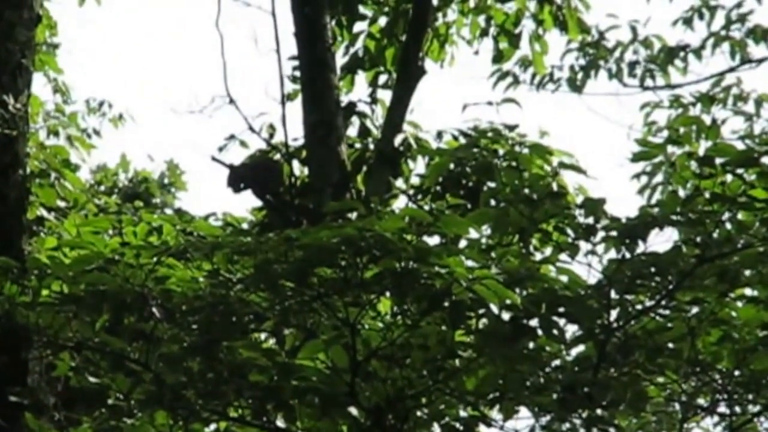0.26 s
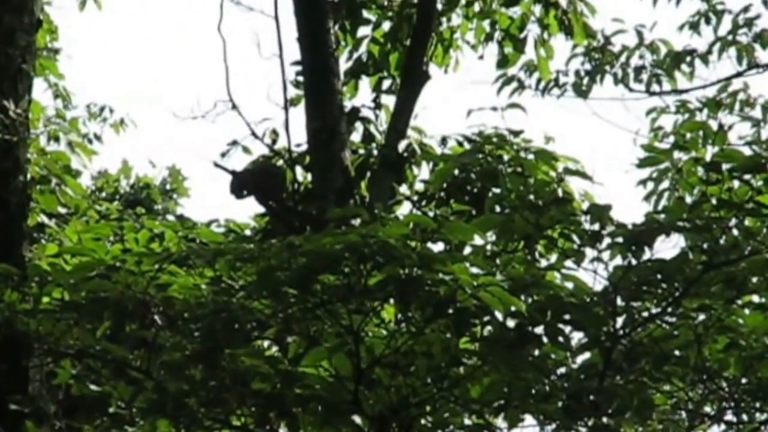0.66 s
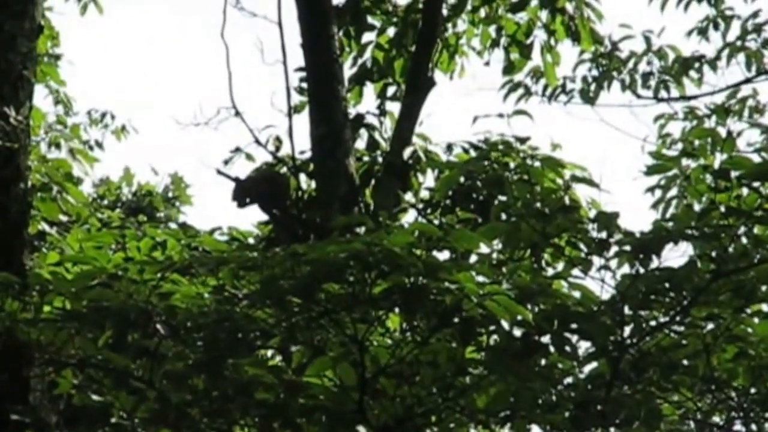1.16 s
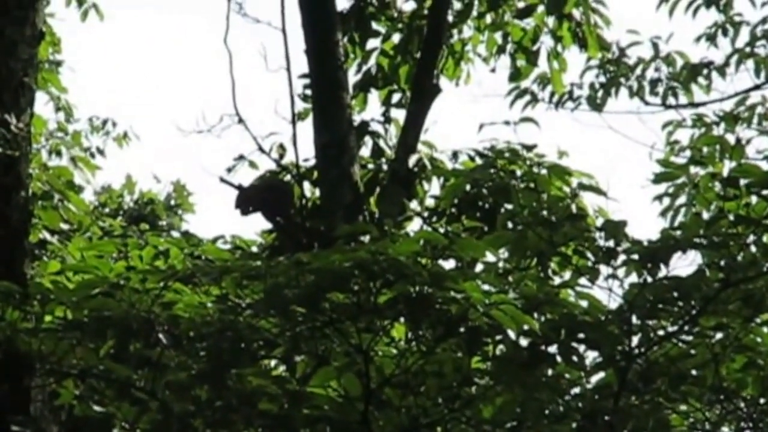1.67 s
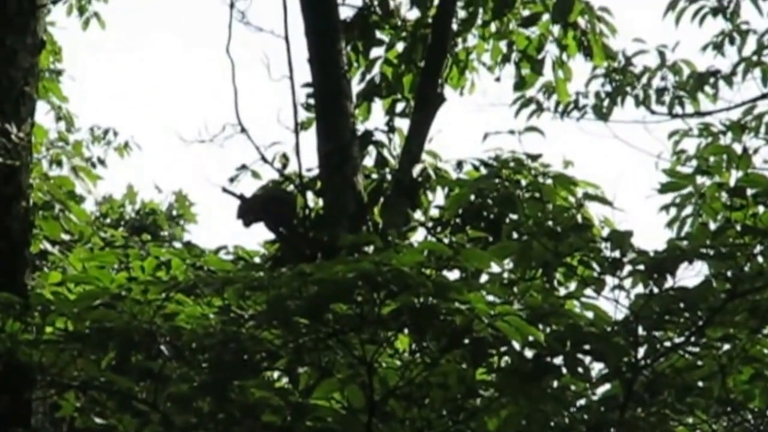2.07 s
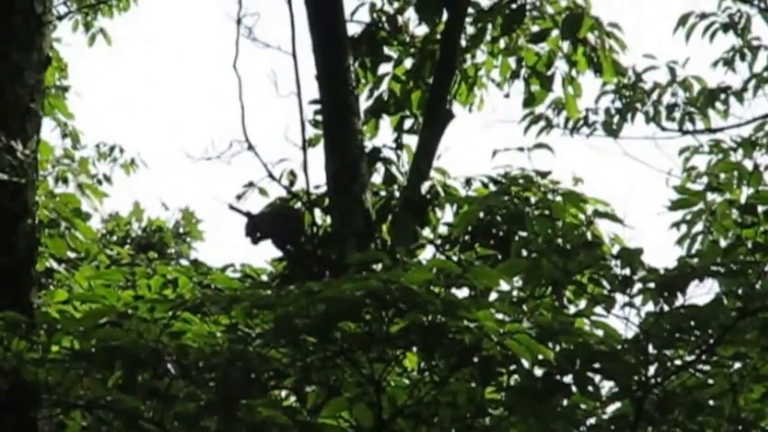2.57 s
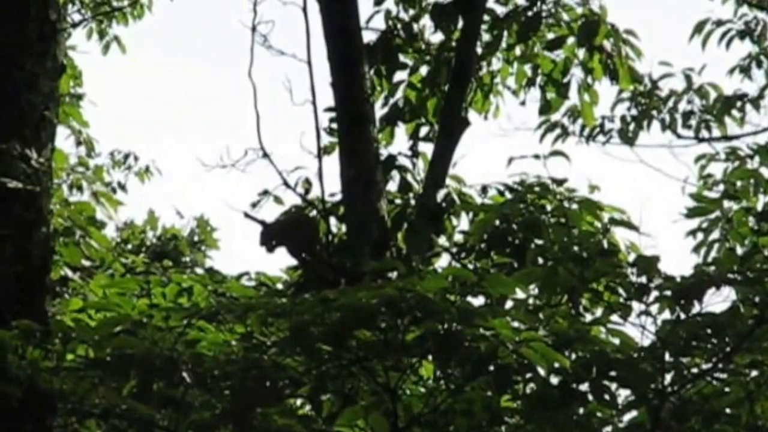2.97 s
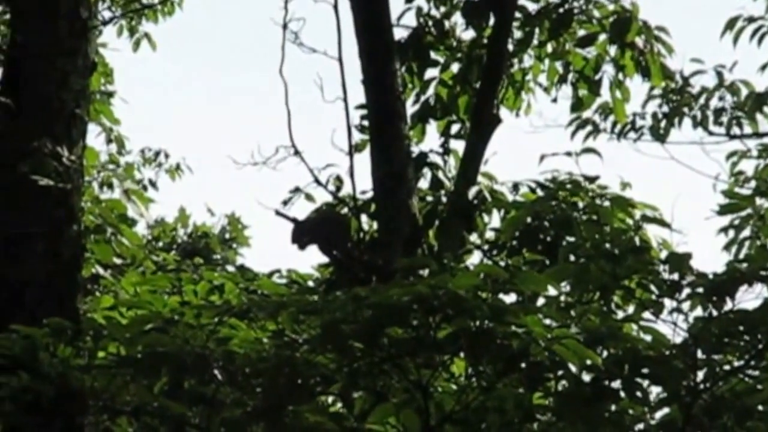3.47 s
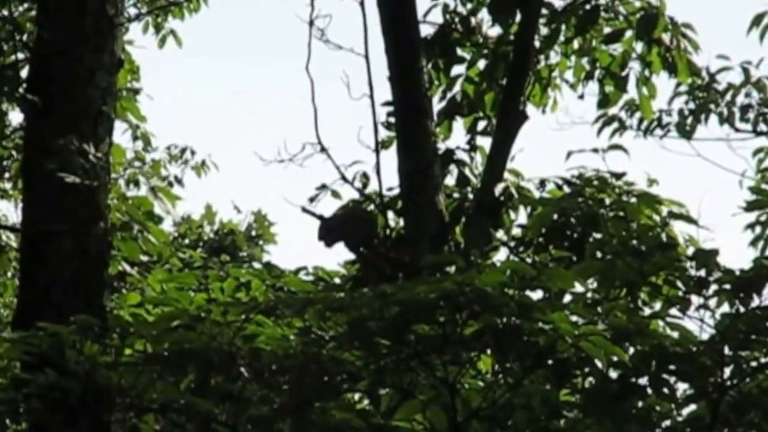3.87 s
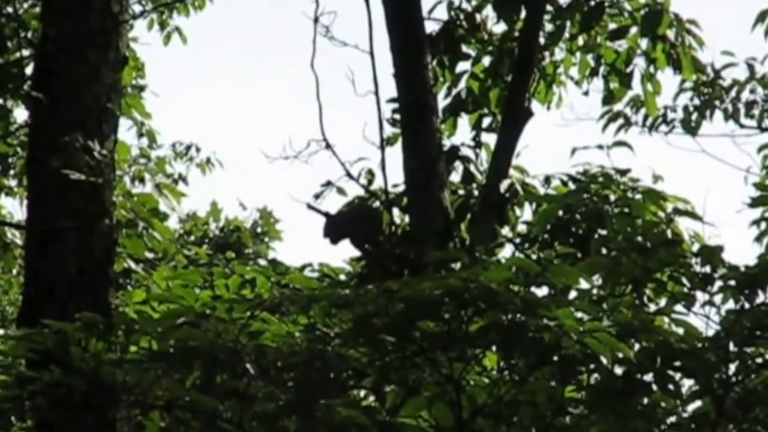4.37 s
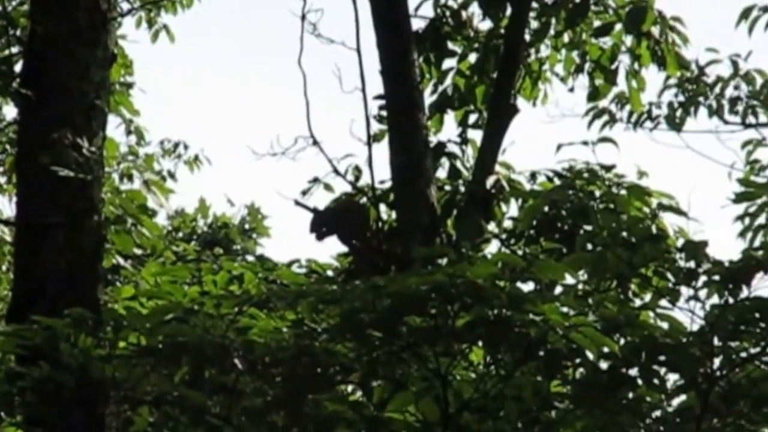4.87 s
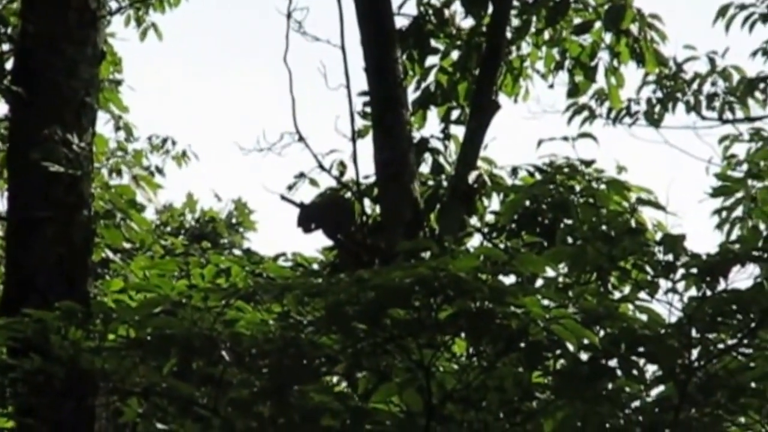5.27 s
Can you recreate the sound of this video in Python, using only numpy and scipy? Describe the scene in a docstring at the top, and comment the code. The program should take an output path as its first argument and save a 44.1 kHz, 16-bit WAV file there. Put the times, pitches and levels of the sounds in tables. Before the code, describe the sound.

A steady, shrill chorus of crickets and katydids in summer woods, with faint knocks and two short bird whistles near the end.

```python
"""Summer woods insect chorus

Katydids and crickets scrape their wings in a dense, shrill chorus, strongest on the right, over a
distant hum and soft hiss. A lower group rasps in waves, two far crickets chirp, a near one trills
louder and louder until all sound drops out briefly. A far dove coos, soft knocks fall, and near
the end a bird whistles twice."""
import sys
import numpy as np
from scipy import signal
from scipy.fft import rfft, irfft, next_fast_len
from scipy.io import wavfile
from scipy.ndimage import map_coordinates

SR = 44100
rng = np.random.default_rng(int(sys.argv[2]) if len(sys.argv) > 2 else 0)


def to_wav(sig):
    """Store sig (one row per channel, or 1-D mono) as 16-bit WAV at the path in sys.argv[1].

    Samples outside -1..1 are clipped; the rate is SR.
    """
    pcm = np.clip(np.atleast_2d(sig), -1, 1) * 32767
    pcm = np.round(pcm).astype(np.int16)
    wavfile.write(sys.argv[1], SR, pcm.T)  # frames by channels


N = 243431
T = np.arange(N) / SR


def amp(db):
    """Decibels to gain."""
    return 10 ** (np.asarray(db) / 20)


def unit(x):
    """Scale to rms 1."""
    return x / np.sqrt(np.mean(x ** 2) + 1e-20)


def along(points, hz):
    """Read (freq_hz, value) points on a log axis."""
    freq_hz, values = np.transpose(points)
    return np.interp(np.log(hz + 1), np.log(freq_hz + 1), values)


def wobble(rate_hz):
    """Smooth random curve, rate_hz knots a second."""
    return map_coordinates(rng.standard_normal(int(N * rate_hz / SR) + 4), [T * rate_hz])


def filtered(x, response):
    """Apply a gain given as a function of frequency."""
    size = next_fast_len(N + SR // 2)
    return irfft(rfft(x, size) * response(np.fft.rfftfreq(size, 1 / SR)), size)[..., :N]


def bell(x, centre, sigma):
    """Gaussian of height 1."""
    return np.exp(-.5 * ((x - centre) / sigma) ** 2)


def band(centre_hz, width_hz):
    """Noise band of rms 1."""
    return unit(filtered(rng.standard_normal(N), lambda f: bell(f, centre_hz, width_hz / 2)))


def tone(pitch_hz):
    """Sine of rms 1 along a pitch curve."""
    return np.sqrt(2) * np.sin(2 * np.pi * (np.cumsum(pitch_hz) / SR + rng.random()))


def pan(lean_db):
    """Stereo gains; lean_db is left minus right."""
    return amp(np.array([[.5], [-.5]]) * lean_db)


def woods(x, wet_db, t60_s):
    """Add scatter from trunks and leaves, different at each ear."""
    tail = rng.standard_normal((2, SR)) * amp(-60 * T[:SR] / t60_s)
    echo = signal.fftconvolve(x[None], tail / np.linalg.norm(tail[0]), axes=1)[:, :N]
    return (x + amp(wet_db) * echo) / np.hypot(1, amp(wet_db))


def scrape(teeth_per_s, stroke_hz, depth_db):
    """File teeth snap past a scraper at uneven moments, louder on each wing stroke."""
    pace_hz = stroke_hz * (1 + .06 * wobble(3.7))
    stroke = np.cos(2 * np.pi * (np.cumsum(pace_hz) / SR + rng.random()))
    teeth = (rng.random(N) < teeth_per_s / SR) * rng.standard_normal(N)
    return unit(teeth * amp(depth_db * stroke))


def swarm(count, teeth_per_s, stroke_hz, depth_db):
    """count insects a side, each scraping at its own pace."""
    out = np.zeros((2, N))
    for side in out:
        for _ in range(count):
            side += scrape(teeth_per_s, stroke_hz * np.exp(.5 * rng.standard_normal()), depth_db)
    return out


def wing_ripple(f, depth_db, spacing_hz):
    """Wings of different sizes ring at different pitches: an uneven response on each side."""
    knots = rng.standard_normal((2, 1024))
    ripple = np.array([np.interp(f / spacing_hz, np.arange(len(side)), side) for side in knots])
    return amp(depth_db * ripple)


# Massed wing resonance: freq_hz, gain_db
WING_SPECTRUM = [(5000, -39.5), (5750, -25), (6100, -6), (6500, -3.5), (6900, -1), (7300, -1.5), (7750, -1),
                 (8100, -5), (8430, -17), (9000, -26.5), (10000, -36), (12000, -51)]
# Chorus balance: freq_hz, lean_db
CHORUS_LEAN = [(5700, -7.5), (6500, -0.5), (7000, -4.5), (7700, -9), (8150, -10), (8500, -14), (9200, -12),
               (11000, -7.5)]


def chorus(level_db=-43.5, sway_db=.03, ticks_per_s=14):
    """Massed strokes ring the wings near 7 kHz; a few close tooth strikes stick out."""
    gain = amp(level_db + sway_db * wobble(7))
    strokes = unit(swarm(count=8, teeth_per_s=3000, stroke_hz=34, depth_db=.5))
    ticks = unit((rng.random((2, N)) < ticks_per_s / SR) * rng.uniform(.5, 1, (2, N)))
    flicker = amp(.4 * np.array([wobble(22), wobble(15)]))
    drive = (strokes + amp(-21) * ticks) * flicker

    def wings(f):
        resonance = amp(along(WING_SPECTRUM, f)) * wing_ripple(f, depth_db=.6, spacing_hz=70)
        return resonance * pan(along(CHORUS_LEAN, f))

    return gain * unit(filtered(drive, wings))


# Distant rumble: freq_hz, gain_db
RUMBLE_SPECTRUM = [(15, -33), (27, -7), (42, -6), (100, -5.5), (140, -4.5), (250, -2.5), (320, -7),
                   (450, -4), (620, -8), (900, -6.5), (1150, -8), (1500, -11), (2500, -14.5), (4500, -25.5),
                   (7000, -120)]
# Rumble likeness between the ears: freq_hz, correlation
RUMBLE_CORRELATION = [(60, 0.86), (150, 0.86), (380, 0.74), (950, 0.48), (2380, 0.4), (5980, -0.16),
                      (15000, -0.05)]
# Distant hum: centre_hz, width_hz, level_db
HUM_BANDS = [(60.7, 2.4, -78), (117.5, 4.2, -80), (199.05, 2.8, -74), (216.7, 8.7, -79.5),
             (357.5, 25, -77.5)]
# Soft hiss: freq_hz, gain_db
HISS_SPECTRUM = [(1500, -25.5), (2600, -9.5), (3550, -1), (4050, -1.5), (4500, 1.5), (5500, 1.5),
                 (7000, -1.5), (9000, -9), (13000, -14), (15700, -15)]


def background():
    """Distant rumble and hum, nearly alike at both ears, under a wide soft hiss."""
    def mid_side(f):
        angle = np.arccos(np.clip(along(RUMBLE_CORRELATION, f), -1, 1)) / 2
        return amp(along(RUMBLE_SPECTRUM, f)) * [np.cos(angle), np.sin(angle)]

    mid, side = filtered(rng.standard_normal((2, N)), mid_side)
    rumble = amp(-62 + .3 * wobble(2.5)) * unit(np.array([mid + side, mid - side]))
    hum = sum(amp(level_db) * band(centre_hz, width_hz) for centre_hz, width_hz, level_db in HUM_BANDS)
    hiss = filtered(rng.standard_normal((2, N)), lambda f: amp(along(HISS_SPECTRUM, f)))
    return rumble + hum + amp(-56) * unit(hiss)


# Crest strength as the group warms up: time_s, effort_db
RASP_CRESTS = [(0, -66), (.8, -57.5), (2.3, -55.5), (3.4, -55), (5.5, -54)]


def raspers(first_s=.14, period_s=.359, sigma_s=.065):
    """A lower group scrapes in even waves: sharp-tuned wings over duller, steadier ones."""
    effort_db = np.interp(T, *np.transpose(RASP_CRESTS))
    crests_s = np.arange(first_s, T[-1] + period_s, period_s)
    waves = amp(effort_db) * sum(bell(T, crest_s, sigma_s) for crest_s in crests_s)
    sharp_strokes = swarm(count=3, teeth_per_s=1100, stroke_hz=55, depth_db=1.5)
    sharp = unit(filtered(sharp_strokes, lambda f: bell(f, 4724, 40) + bell(f, 4868, 44)))
    dull_strokes = swarm(count=3, teeth_per_s=1300, stroke_hz=45, depth_db=2.5)
    dull = unit(filtered(dull_strokes, lambda f: bell(f, 4520, 210)))
    return amp(-3.5) * waves * sharp * pan(-3) + (amp(-16) * waves + amp(-68)) * dull * pan(-1)


# One row per far cricket: first_s, period_s, pitch_hz
CHIRP_RUNS = [(.18, .32, 6162), (.24, .343, 6032)]


def far_crickets(chirps=7, gain_db=-57.5, sigma_s=.04, pulse_hz=30):
    """Two crickets chirp, each at its own pace; quick pulses merge into thin notes among the trees."""
    out = np.zeros(N)
    for first_s, period_s, pitch_hz in CHIRP_RUNS:
        for centre_s in first_s + period_s * np.arange(chirps):
            pulses = 1 + .6 * np.cos(2 * np.pi * pulse_hz * (T - centre_s))
            out += bell(T, centre_s, sigma_s) * pulses * tone(pitch_hz + 14 * wobble(60))
    return amp(gain_db) * woods(out, wet_db=-1.5, t60_s=.38) * pan(-1)


# Coos: centre_s, pitch_hz, level_db, sigma_s
DOVE_COOS = [(.66, 513, -67.5, .11), (1.74, 509, -70, .12), (2.96, 516, -73, .16)]


def dove():
    """Three hollow, even-pitched coos from far off."""
    coos = sum(amp(level_db) * bell(T, centre_s, sigma_s) * tone(pitch_hz + 2 * wobble(10))
               for centre_s, pitch_hz, level_db, sigma_s in DOVE_COOS)
    return woods(coos, wet_db=-10, t60_s=.5)


# Near cricket's growing effort: time_s, effort_db
TRILL_EFFORT = [(.7, -62), (1.1, -56.5), (1.45, -52.5), (1.7, -47), (2.45, -44.2)]


def near_cricket(full_effort_hz=7425, flat_hz_per_db=11, sag_hz=140, closures_per_s=26):
    """Each wing closure is a short pure note that sags in pitch; softer notes are flatter."""
    last_note_s, stop_s = 2.441, 2.447
    effort_db = np.interp(T, *np.transpose(TRILL_EFFORT))
    pitch_hz = full_effort_hz - flat_hz_per_db * (effort_db.max() - effort_db)
    cycle = ((T - last_note_s) * closures_per_s + .5) % 1 - .5
    notes = tone(pitch_hz - sag_hz * cycle + 15 * wobble(120)) * bell(cycle, 0, .18)
    trill = amp(effort_db + wobble(18)) * notes * (T < stop_s)
    return woods(trill, wet_db=-5, t60_s=.14) * pan(-10.5)


# Knocks and thuds: start_s, strength_db, ring_hz, width_hz, t60_s, lean_db
BLOWS = [(1.887, -52, 1850, 400, .025, -4), (1.8935, -39.5, 1710, 300, 0.019, -19),
         (1.896, -36, 1830, 397, 0.013, -12), (1.888, -52, 290, 520, 0.3, -2),
         (2.437, -49.5, 1980, 1400, 0.033, -11), (4.556, -49.5, 820, 550, 0.1, 9),
         (4.577, -49, 870, 480, 0.19, 8), (4.608, -52, 560, 600, 0.35, -2), (4.619, -52, 232, 317, .3, 0),
         (4.661, -48.5, 330, 350, 0.042, -2)]


def knocks(gain_db=-4.5, attack_s=.001):
    """Small dull blows, each a short burst in one damped resonance."""
    out = np.zeros((2, N))
    for start_s, strength_db, ring_hz, width_hz, t60_s, lean_db in BLOWS:
        age_s = np.maximum(T - start_s, 0)
        envelope = amp(-60 * age_s / t60_s) * (1 - np.exp(-age_s / attack_s))
        out += amp(strength_db + gain_db) * envelope * band(ring_hz, width_hz) * pan(lean_db)
    return out


# Whistles: start_s, length_s, level_db
BIRD_WHISTLES = [(4.775, .088, -53), (5.159, .086, -52.5)]
# Shape of one whistle: length_fraction, pitch_hz, gain_db
WHISTLE_ARCH = [(0, 1190, -7), (.15, 1370, -4), (.3, 1469, -2.5), (.5, 1503, -1), (.7, 1478, -2),
                (.84, 1399, 0.5), (1, 1240, -8)]


def bird():
    """Two husky whistles rise and fall; near trunks throw each back and the woods ring on."""
    fraction, arch_hz, arch_db = np.transpose(WHISTLE_ARCH)
    out = np.zeros(N)
    for start_s, length_s, level_db in BIRD_WHISTLES:
        progress = (T - start_s) / length_s
        pitch_hz = np.interp(progress, fraction, arch_hz) + 18 * wobble(200)
        shape_db = np.interp(progress, fraction, arch_db) + 1.8 * wobble(150)
        out += amp(level_db + shape_db) * (progress > 0) * (progress < 1) * tone(pitch_hz)
    trunk_echoes = .5 * np.interp(T - .016, T, out) + .45 * np.interp(T - .029, T, out)
    return woods(out + trunk_echoes, wet_db=-3.5, t60_s=2)


def scene():
    """Everything heard from one spot under the trees."""
    return (chorus() + background() + raspers() + far_crickets()
            + dove() + near_cricket() + knocks() + bird())


def record(dry):
    """The sound drops out briefly; the highest treble is cut throughout."""
    drop_s, resume_s, floor_db, cutoff_hz = 2.447, 2.584, -60, 15780
    fade_out = np.clip((drop_s - T) / .003 + .5, 0, 1)
    fade_in = np.clip((T - resume_s) / .01 + .5, 0, 1)
    gain = np.maximum(fade_out + fade_in, amp(floor_db))
    return filtered(dry * gain, lambda f: f < cutoff_hz)


dry = scene()
out = record(dry)
to_wav(out)
```